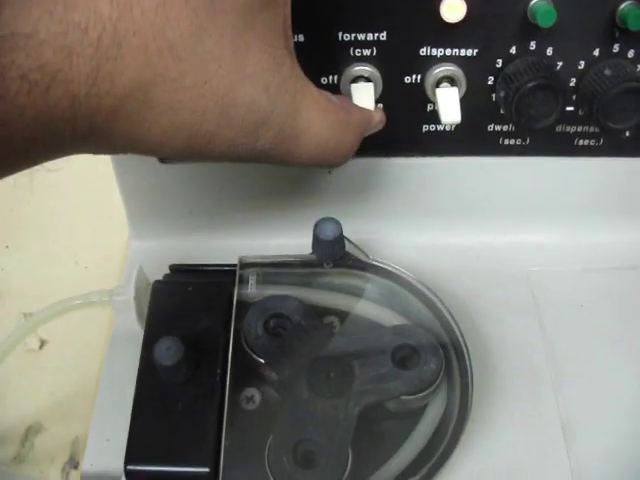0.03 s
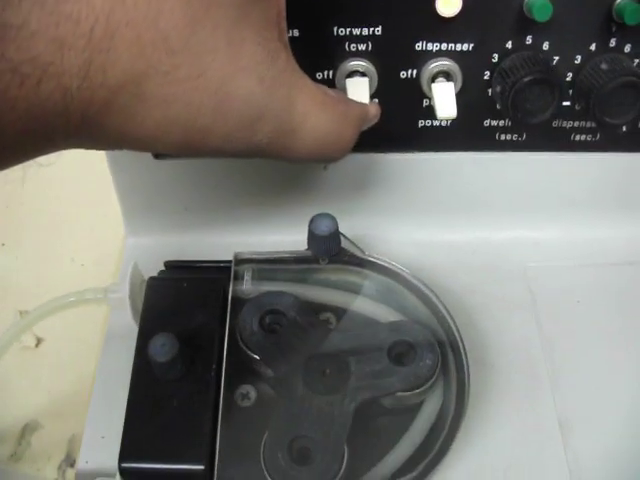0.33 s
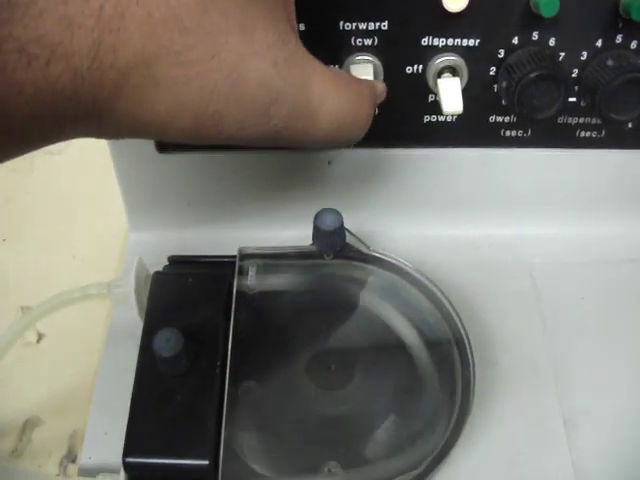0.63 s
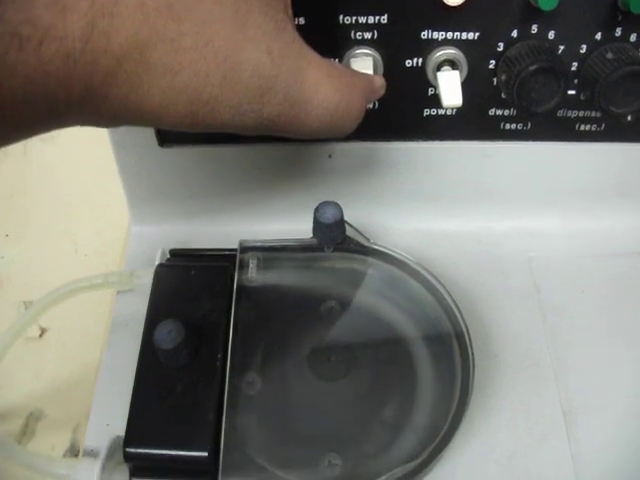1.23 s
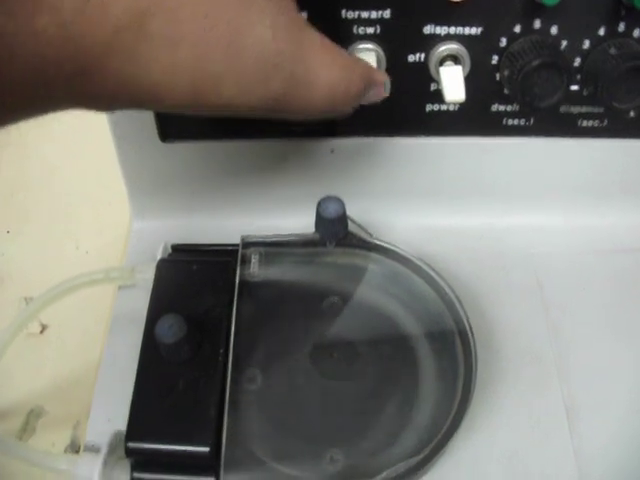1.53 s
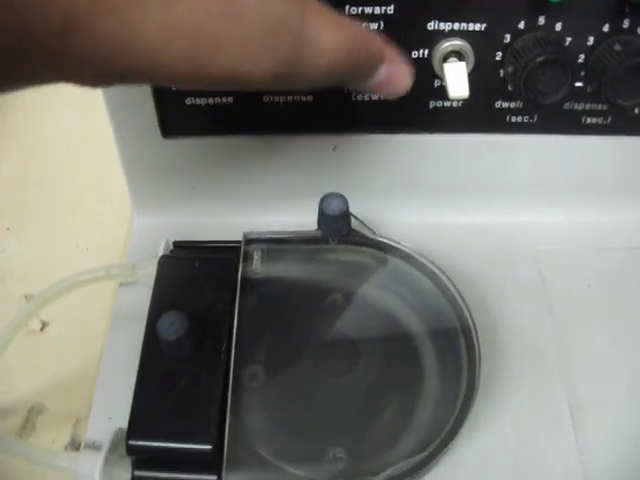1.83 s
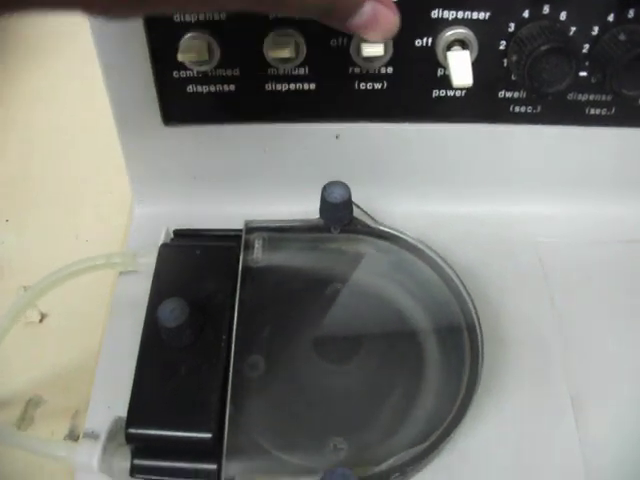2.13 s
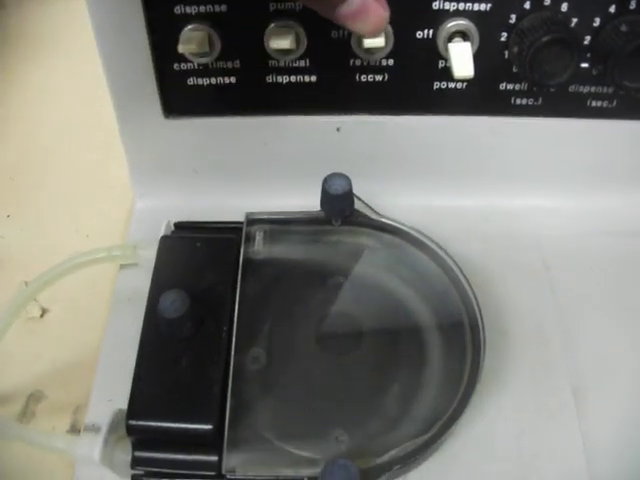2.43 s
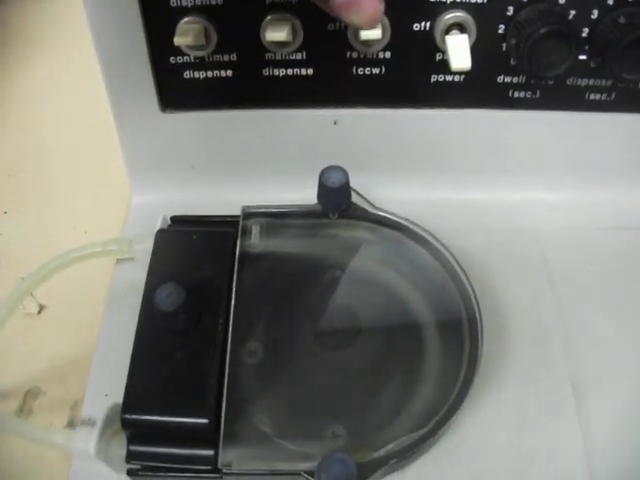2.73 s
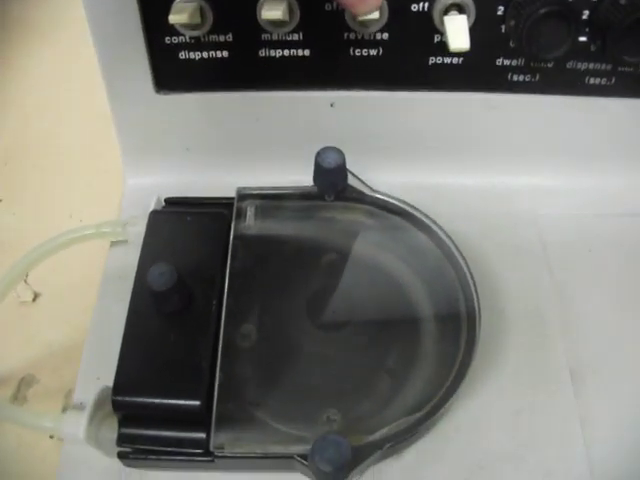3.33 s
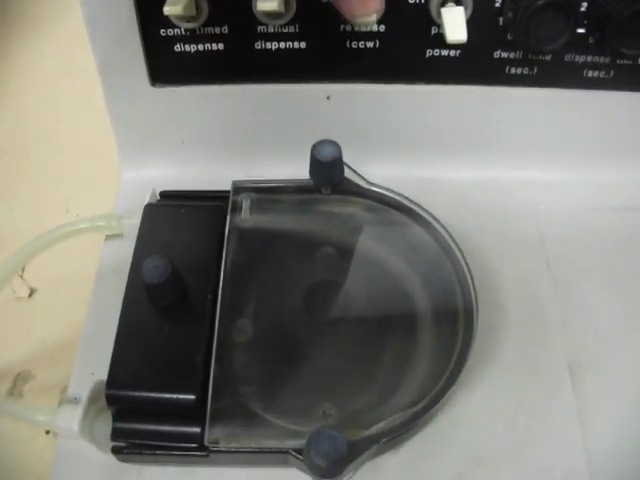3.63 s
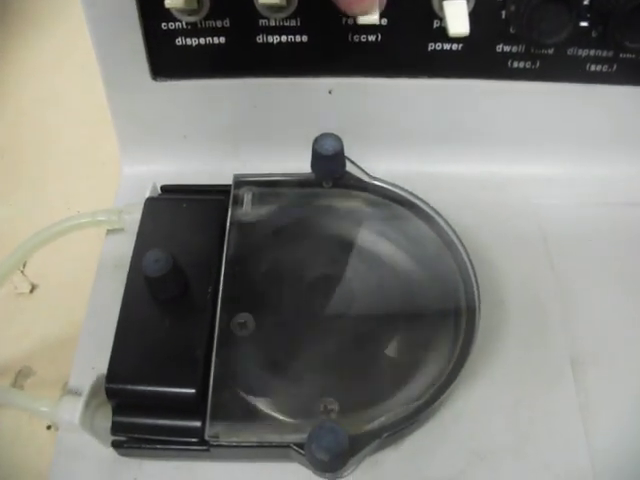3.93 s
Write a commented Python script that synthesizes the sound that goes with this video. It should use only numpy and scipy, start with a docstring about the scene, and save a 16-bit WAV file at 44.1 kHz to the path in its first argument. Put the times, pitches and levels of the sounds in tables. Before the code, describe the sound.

A small pump motor clicks on and runs with a loud, fast rattle.

```python
"""A small roller pump on a bench indoors. First, room rumble, thin hiss and a faint hum.
At 0.55 s a toggle switch snaps, its panel buzzes and the motor spins up to about 33 turns/s.
The loose gear train knocks once per turn and chatters in between, ringing the housing; the case drones.
At 3.62 s a second flick lets the pump run down.
Throughout, the sound is dull above 3 kHz; the close microphone overloads on the hardest knocks."""
import sys
import numpy as np
from scipy import signal
from scipy.fft import rfft, irfft
from scipy.io import wavfile

SR = 44100
rng = np.random.default_rng(int(sys.argv[2]) if len(sys.argv) > 2 else 0)


def unload_wav(signal):
    """Save mono or channel-first audio to the path in sys.argv[1] as 16-bit WAV at rate SR, clipped to [-1, 1]."""
    wavfile.write(
        sys.argv[1],
        SR,
        np.round(np.clip(np.atleast_2d(signal).T, -1, 1) * 32767).astype(np.int16),
    )


N = 176400
T = np.arange(N) / SR

# Room noise spectrum. Each row: frequency in Hz, relative density in dB.
FLOOR_SPECTRUM = [(20, -11), (32, -9), (42, -2), (60, -9.5), (90, -7), (115, -18), (190, -29), (300, -26.5),
                  (420, -27.5), (800, -32), (1700, -28), (2150, -21.5), (2420, -9), (2580, -19),
                  (2780, -14), (3100, -25.5), (4500, -22), (6000, -26.5)]
# Case hum, swelling at switch-on. Each row: time in seconds, level in dB.
HUM_ENVELOPE = [(0, -55), (.15, -41.5), (.25, -39.5), (.42, -44), (.555, -54), (.578, -17.5), (.615, -15),
                (.67, -41.5)]
# Motor speed. Each row: time in seconds, speed in turns per second.
MOTOR_SPEED = [(0.556, 0.0), (0.7, 17.185), (0.87, 27.005), (1.02, 29.436), (1.35, 32.685), (2.1, 32.978),
               (2.7, 33.411), (3.63, 33.355), (3.78, 18.701), (4.0, 4.717)]
# Drive tones. Each row: multiple of the motor speed, level at top speed in dB.
MOTOR_ORDERS = [(4, -43.5), (5, -28), (6, -23.5), (8, -44), (20, -34)]
# Load cycle of three turns. Each row: relative knock level in dB, relative thump level in dB.
LOAD_CYCLE = [(-3.5, -2.5), (-2.5, -6.5), (-16.5, 2)]
# Heaviest roller thumps. Each row: start in seconds, relative level in dB.
HEAVY_THUMPS = [(.885, 8.5), (1.565, 3.5), (1.99, 6), (2.371, 0), (2.64, 12.5), (3.45, 5), (3.704, 8.5)]
# Drive of the case drone. Each row: time in seconds, relative level in dB.
DRONE_ENVELOPE = [(.55, -68.5), (.58, -6), (.66, -1.5), (.72, 0), (.9, 2.5), (2.2, 0.5), (3.74, 1),
                  (3.87, -4.5), (4.0, -10)]
# Low case modes. Each row: frequency in Hz, bandwidth in Hz, level in dB.
CASE_MODES = [(141.2, 15.3, -24.5), (182.5, 19, -23), (195.7, 13.3, -25)]
# Toggle snaps. Each row: start in seconds, relative level in dB.
SWITCH_SNAPS = [(.549, -10), (0.5561, 7), (3.620, 3.5)]
# Switch panel modes. Each row: frequency in Hz, bandwidth in Hz, relative level in dB.
PANEL_MODES = [(1590, 600, -34), (2800, 390, -7), (3050, 75, -5.5), (3500, 130, -17.5), (4470, 230, -7)]
# Gear chatter and regular knocks. Each row: time in seconds, relative level in dB.
CHATTER_ENVELOPE = [(.555, -69), (.61, -4.5), (.675, -10.5), (.69, -0.5), (.73, -1), (.765, -13),
                    (.80, 1.5), (1.0, 1.5), (1.6, 1.5), (2.6, 1), (3.6, 1.5), (3.635, -2), (3.68, 0.5),
                    (3.74, 0), (3.765, -5), (3.86, -3), (3.9, -12), (4.0, -32.5)]
# Hardest gear knocks. Each row: start in seconds, relative level in dB.
HARD_GEAR_KNOCKS = [(0.871, 15.5), (1.045, -5), (1.178, 3.5), (1.240, 13.5), (1.305, 13), (1.52, 11),
                    (1.61, 11), (1.854, 11), (1.973, 13.5), (2.126, 7.5), (2.308, 11.5), (2.398, 2.5),
                    (2.579, 9), (2.881, 11), (3.240, 15.5), (3.3, 13), (3.384, 9), (3.474, 6), (3.565, 4),
                    (3.693, 9), (3.731, 6), (3.78, 12), (3.838, 11.5), (3.923, 0)]
# Housing modes. Each row: frequency in Hz, bandwidth in Hz, relative level in dB.
HOUSING_MODES = [(265, 12.7, -35.5), (359.5, 45, -33), (518.3, 90, -27.5), (654.7, 22.3, -29),
                 (959, 63, -18.5), (1087.2, 28, -29.5), (1308, 124, -25), (1529, 86, -24.5),
                 (1689, 46, -35), (2004, 48, -30.5), (2300, 170, -23), (2761, 118, -24), (2953, 660, -28.5)]
# Overall tone: dull above 3 kHz, steep treble cut near 6 kHz. Each row: frequency in Hz, gain in dB.
OVERALL_TONE = [(20, 1.5), (3000, -3.5), (3500, -8.5), (4000, -13.5), (5200, -23), (5800, -30.5),
                (6400, -66), (8000, -86.5)]
# Treble loss after the overload. Each row: frequency in Hz, gain in dB.
OUTPUT_RESPONSE = [(20, -3), (5000, 1), (6500, -9.5), (10000, -2.5), (16000, -8.5)]


def from_db(db):
    """Decibels to gain."""
    return 10 ** (np.asarray(db) / 20)


def unit_rms(x):
    """Scale to rms 1."""
    return x / np.sqrt(np.mean(x ** 2) + 1e-20)


def curve(rows):
    """Linear interpolation of (seconds, value) rows."""
    return np.interp(T, *np.transpose(rows))


def colour(x, response):
    """Filter by (Hz, dB) rows."""
    hz, db = np.transpose(response)
    bins_hz = np.maximum(np.fft.rfftfreq(2 * N, 1 / SR), 1)
    gain = from_db(np.interp(np.log(bins_hz), np.log(hz), db))
    return irfft(rfft(x, 2 * N) * gain)[:N]


def butterworth(x, order, hz, kind="low"):
    """Causal low-pass or high-pass."""
    return signal.sosfilt(signal.butter(order, hz, kind, fs=SR, output="sos"), x)


def resonate(x, hz, width_hz):
    """One mode, peak gain 1."""
    radius = np.exp(-np.pi * width_hz / SR)
    feedback = [1, -2 * radius * np.cos(2 * np.pi * hz / SR), radius ** 2]
    return signal.lfilter(np.array([1, 0, -1]) * (1 - radius ** 2) / 2, feedback, x + 1e-18)


def impulses(times_s, levels_db):
    """One impulse at each time."""
    train = np.zeros(N)
    np.add.at(train, np.clip((times_s * SR).astype(int), 0, N - 1), from_db(levels_db))
    return train


def decay(x, tau_s):
    """Exponential tail on each impulse."""
    return signal.lfilter([1], [1, -np.exp(-1 / (tau_s * SR))], x + 1e-18)


def each_turn(turns, lag_turns=0):
    """Time in seconds, knock dB and thump dB of each completed turn."""
    count = np.arange(1, int(turns[-1]) + 1)
    knock_db, thump_db = np.array(LOAD_CYCLE)[count % len(LOAD_CYCLE)].T
    return np.interp(count + lag_turns, turns, T), knock_db, thump_db


def background(floor_db=-26.5, hum_hz=149, whine_hz=291, fade_db_per_s=65):
    """Room rumble and narrow hiss, case hum, and a faint tone dying away at the outset."""
    floor = from_db(floor_db) * unit_rms(colour(rng.standard_normal(N), FLOOR_SPECTRUM))
    hum = from_db(curve(HUM_ENVELOPE)) * np.sin(2 * np.pi * hum_hz * T)
    whine = from_db(-40 - fade_db_per_s * T) * np.sin(2 * np.pi * whine_hz * T)
    return floor + np.sqrt(2) * (hum + whine)


def room_reverb(x, t60_s=0.38, gap_s=0.004, gain_db=-9):
    """Short diffuse tail from nearby walls."""
    tail = rng.standard_normal(N) * from_db(-60 * T / t60_s) * (T > gap_s)
    return from_db(gain_db) * signal.fftconvolve(x, tail / np.linalg.norm(tail))[:N]


def motor_tones(turns, speed_hz, waver_depth=0.14):
    """Multiples of the motor speed, wavering in level, heard only near full speed."""
    tones = 0
    for order, db in MOTOR_ORDERS:
        waver = unit_rms(butterworth(rng.standard_normal(N), order=2, hz=8))
        tone = np.sqrt(2) * np.sin(2 * np.pi * (order * turns + rng.random()))
        tones += from_db(db) * (1 + waver_depth * waver) * tone
    return tones * (speed_hz / speed_hz.max()) ** 6


def case_drone(turns, shake_db=-31):
    """A roller thump per turn, some heavier ones and steady shaking drive the low case modes."""
    times_s, _, thump_db = each_turn(turns, lag_turns=0.092)
    thumps = impulses(times_s, thump_db) + impulses(*np.transpose(HEAVY_THUMPS))
    envelope = from_db(curve(DRONE_ENVELOPE))
    drone = 0
    for k, (hz, width_hz, db) in enumerate(CASE_MODES):
        shake = from_db(shake_db) * rng.standard_normal(N)
        force = envelope * ((-1) ** k * thumps + shake)
        drone += from_db(db) * unit_rms(resonate(force, hz, width_hz))
    return butterworth(drone, order=4, hz=110, kind="high")


def panel_buzz(start_s=0.561, end_s=0.618, release_s=0.012, rate_hz=119.4, depth_db=3.5, level_db=-12):
    """At switch-on the panel buzzes at twice the mains rate, then settles."""
    gate = (T > start_s) * np.exp(-np.maximum(T - end_s, 0) / release_s)
    pulsing = from_db(depth_db * np.cos(2 * np.pi * rate_hz * (T - start_s)))
    force = butterworth(pulsing * rng.standard_normal(N), order=4, hz=3400)
    ring = sum((-1) ** k * from_db(db) * resonate(force, hz, width_hz)
               for k, (hz, width_hz, db) in enumerate(PANEL_MODES))
    return from_db(level_db) * gate * unit_rms(ring)


def toggle_switch(snap_decay_s=0.0032):
    """The toggle snaps over; its panel rings briefly."""
    snaps = impulses(*np.transpose(SWITCH_SNAPS))
    force = snaps + 0.24 * decay(snaps, snap_decay_s) * rng.standard_normal(N)
    return sum(from_db(db) * resonate(force, hz, width_hz) * SR / (2 * np.pi * width_hz)
               for hz, width_hz, db in PANEL_MODES)


def gear_contacts(envelope, knocks, rate_per_s=2200, spread_db=4, impact_gain=1.08):
    """Contact force: tiny random impacts of uneven size, plus the first impact of each knock."""
    hits = (rng.random(N) < rate_per_s / SR) * rng.choice([-1, 1], N)
    sizes = from_db(spread_db * rng.standard_normal(N))
    return envelope * hits * sizes + impact_gain * knocks * rng.choice([-1, 1], N)


def gear_train(turns, knock_db=8, swell_db=5, knock_decay_s=0.0014, hard_decay_s=0.0036):
    """Loose gears chatter and knock once per turn with a burst of rebounds, ringing the housing."""
    times_s, load_db, _ = each_turn(turns)
    scatter_db = rng.standard_normal(N)[:len(times_s)]
    level = from_db(curve(CHATTER_ENVELOPE))
    regular = level * impulses(times_s, knock_db + load_db + scatter_db)
    hard = impulses(*np.transpose(HARD_GEAR_KNOCKS))
    knocks = regular + hard
    chatter = level * from_db(swell_db * np.abs(np.cos(np.pi * turns)) ** 5.26)  # one swell per turn
    envelope = np.sqrt(chatter ** 2 + decay(regular, knock_decay_s) ** 2 + decay(hard, hard_decay_s) ** 2)
    ring = sum(from_db(db) * unit_rms(resonate(gear_contacts(envelope, knocks), hz, width_hz))
               for hz, width_hz, db in HOUSING_MODES)
    broadband = unit_rms(resonate(gear_contacts(envelope, knocks), hz=2400, width_hz=1800))
    return from_db(3.5) * ring + from_db(-22) * broadband


def scene():
    """Pump and switch over the background; reverb on gears, switch and buzz only."""
    speed_hz = curve(MOTOR_SPEED)
    turns = np.cumsum(speed_hz) / SR
    clatter = gear_train(turns) + toggle_switch() + panel_buzz()
    mix = clatter + room_reverb(clatter) + case_drone(turns) + motor_tones(turns, speed_hz) + background()
    return mix[None]


def limiter(x, threshold_db=-2, attack_s=0.0045, release_db_per_s=120.5):
    """Gain drops just after a peak, then recovers."""
    over_db = np.maximum(20 * np.log10(np.abs(x) + 1e-9) - threshold_db, 0)
    release_db = release_db_per_s * T
    held_db = np.maximum.accumulate(over_db + release_db) - release_db
    return x * from_db(-decay(held_db, attack_s) / (attack_s * SR))


def record(dry, clip_level=0.70, cutoff_hz=16000):
    """Dull overall tone, limiter too slow for the knocks, hard clip, treble loss, low-pass."""
    dull = colour(dry[0], OVERALL_TONE)
    clipped = np.clip(limiter(dull), -clip_level, clip_level)
    lowpass = signal.butter(16, cutoff_hz, fs=SR, output="sos")
    return signal.sosfiltfilt(lowpass, colour(clipped, OUTPUT_RESPONSE))[None]


dry = scene()
out = record(dry)
unload_wav(out)
```